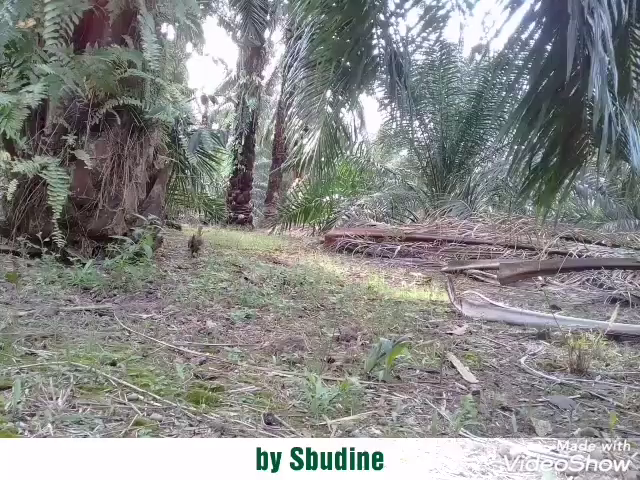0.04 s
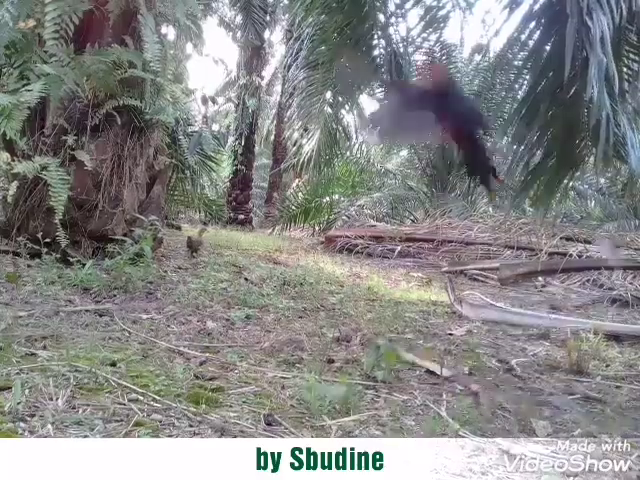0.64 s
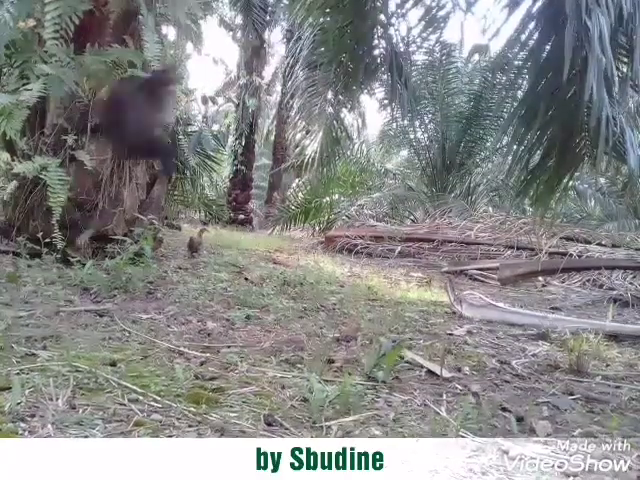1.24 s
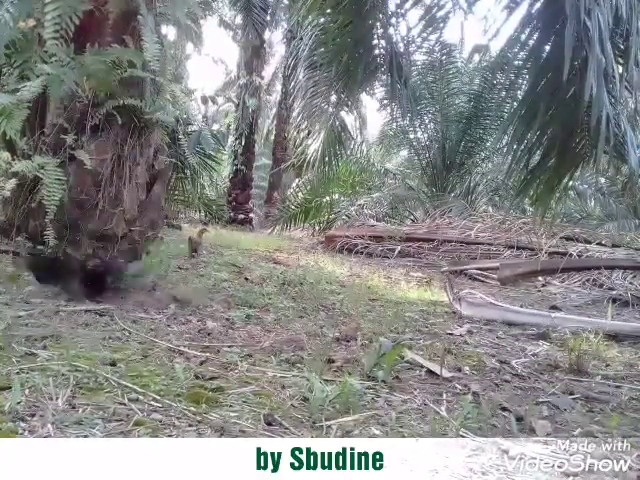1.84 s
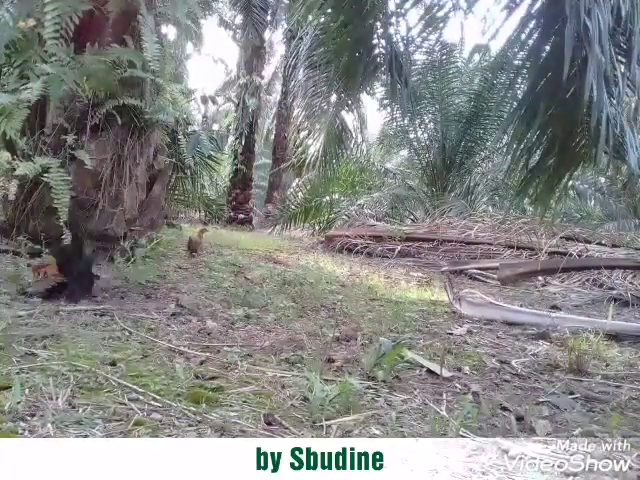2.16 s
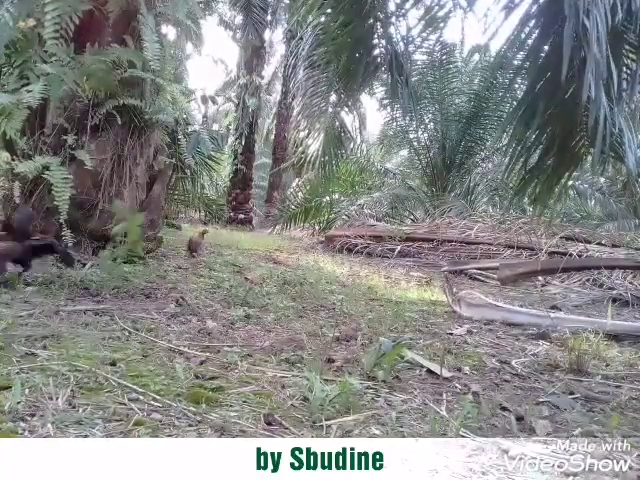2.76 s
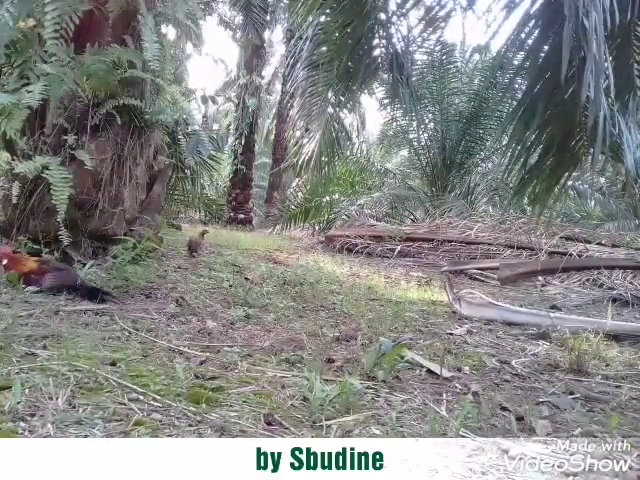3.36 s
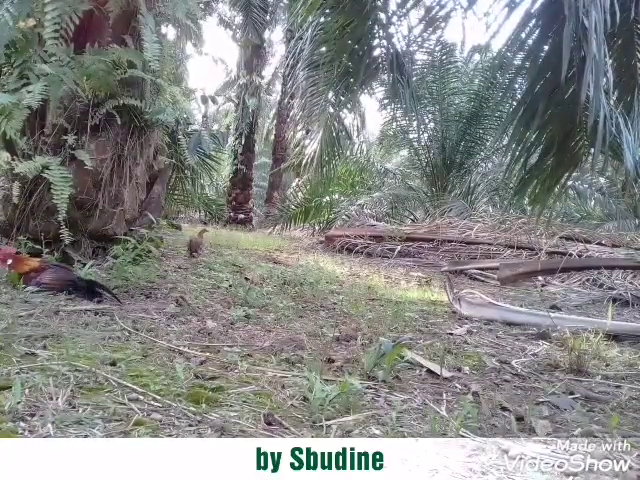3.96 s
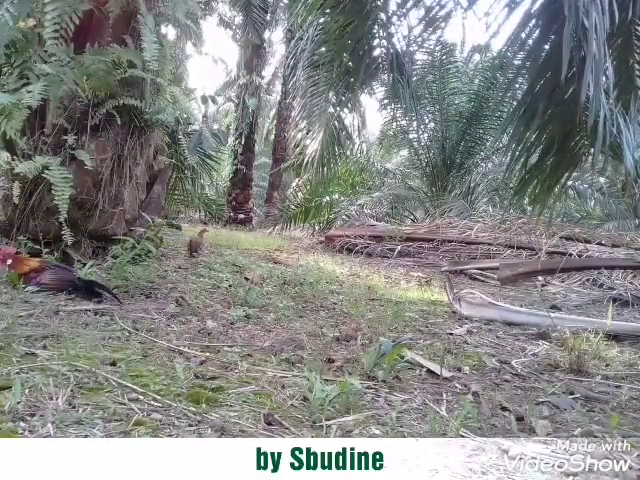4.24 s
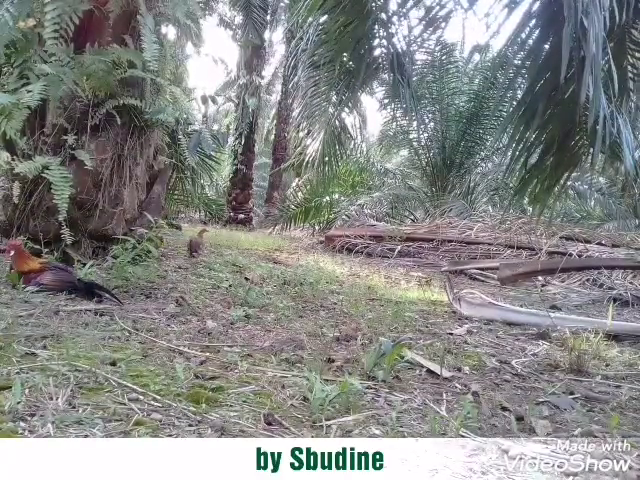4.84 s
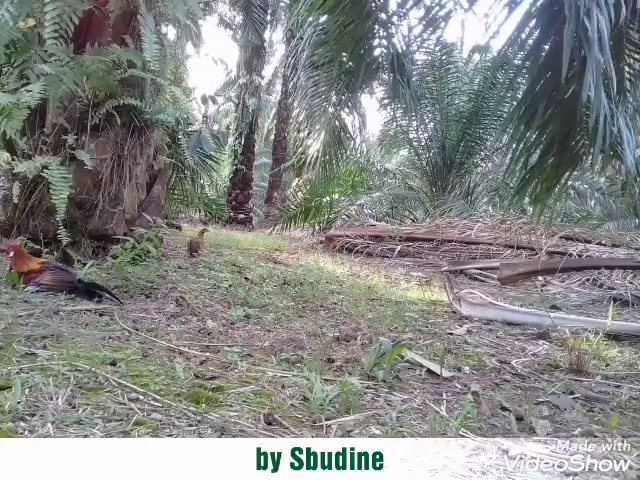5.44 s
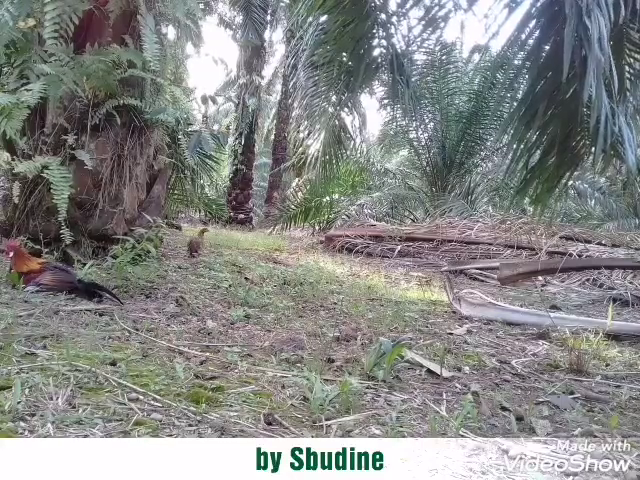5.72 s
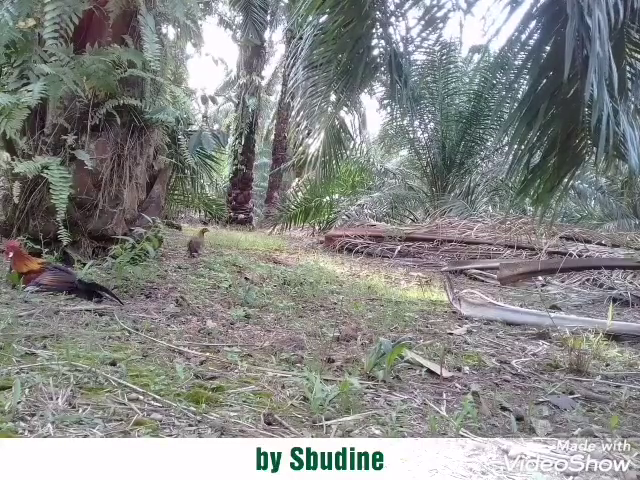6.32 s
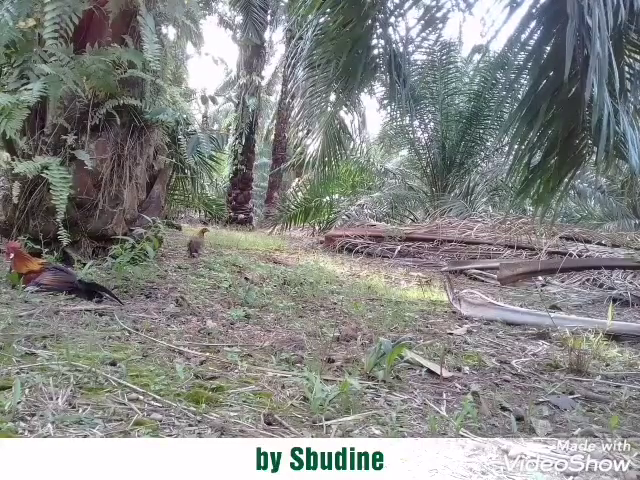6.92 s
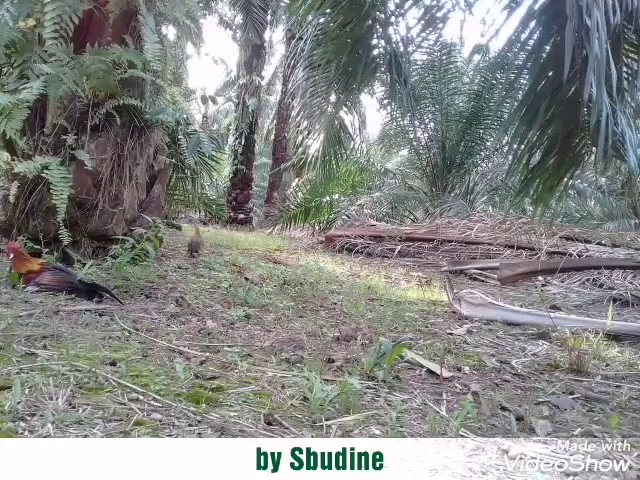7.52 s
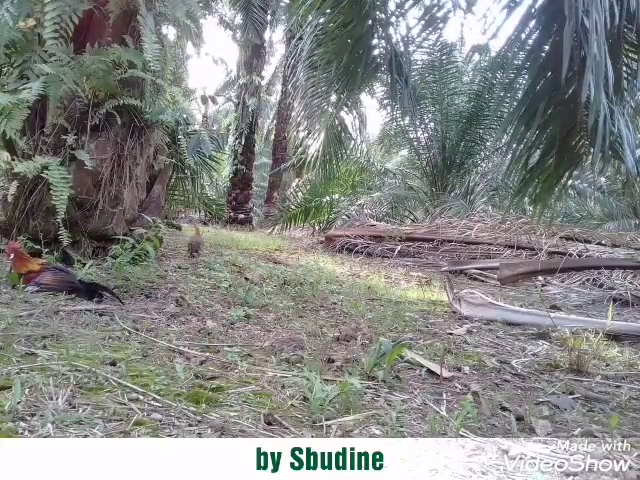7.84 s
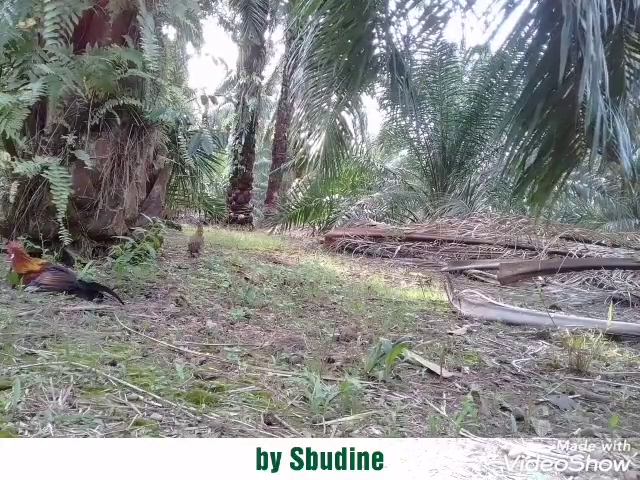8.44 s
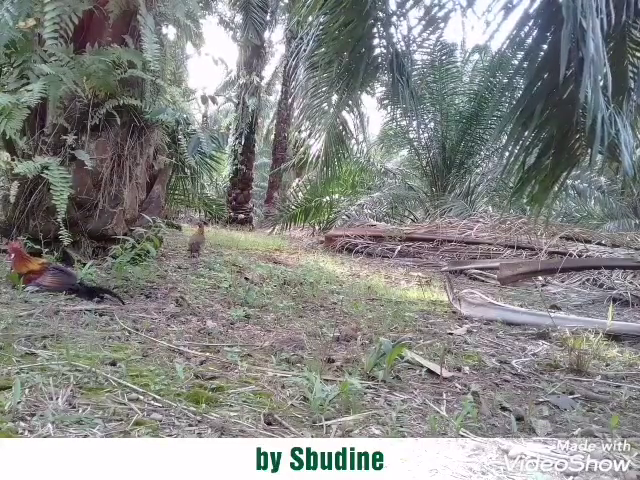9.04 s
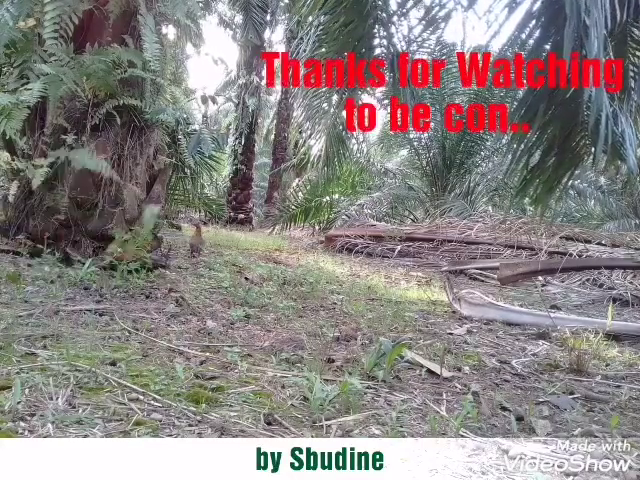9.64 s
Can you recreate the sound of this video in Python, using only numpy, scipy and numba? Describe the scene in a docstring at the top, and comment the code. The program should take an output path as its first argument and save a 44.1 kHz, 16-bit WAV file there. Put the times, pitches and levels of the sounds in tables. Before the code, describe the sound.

A wild rooster flutters close to the microphone in a quiet palm grove. Wingbeats start at once with three short clucks, and are loudest from about 0.5 to 1 second, with sharp quill snaps, hollow thuds and a low gust of air as he passes overhead. A few thin, very high squeaks follow. He flaps on until about 2 seconds, then scuffles in dry leaves. A quick run of short, raspy clucks lasts from about 1.9 to 3 seconds, with a few much fainter ones until 4.7. A distant bird pips softly near 3.3 and 5.2 seconds, and an insect gives faint trills around 4 to 5. From 4.8 seconds to the end, around 9.5, he shifts in the crackling leaves in short spells, fullest near 8, with small snaps and soft thumps. Underneath are a soft air hiss, a barely audible far rumble and faint high insects slowly fading.

```python
"""Insects sing in a palm grove as a wild rooster flutters up past a low microphone: quills snap, wings thud and
fan the air, and a small bird lets out thin squeaks. About two seconds in he lands, scuffles in dry, crackling
leaves and gives a run of short clucks, rough pulses that ring in his throat. As the clucks die away, a far bird
pips and an insect trills. Later he shifts about in the leaves, a soft rumble swells twice in the distance, and
the insects slowly ease off."""
import sys
import numpy as np
from scipy import signal
from scipy.fft import rfft, irfft
from scipy.io import wavfile
from scipy.ndimage import uniform_filter1d
from numba import njit

SR = 44100
rng = np.random.default_rng(int(sys.argv[2]) if len(sys.argv) > 2 else 0)


def dump(signal):
    """Clip the signal to [-1, 1] and save it as 16-bit WAV at the path in sys.argv[1]."""
    limited = np.clip(np.atleast_2d(signal).T, -1, 1)
    pcm = np.round(limited * 32767).astype(np.int16)
    wavfile.write(sys.argv[1], SR, pcm)


N = 426888
T = np.arange(N) / SR

# How strong each frequency is in the grove's air, dry leaves and feathers: frequency_hz, relative_db
AIR_TONE = [(20, -25), (45, -2), (85, -1), (190, 0), (400, -4), (700, -4), (1300, -7.5), (2500, -5.5),
            (4400, -10.5), (6300, -12.5), (8000, -6.5), (9500, -5.5), (11500, -12.5), (15500, -15.5)]
LEAF_TONE = [(200, -22.5), (1500, -30), (3000, -19), (5000, -12), (7000, -9), (8400, -4), (9500, 2),
             (10300, -2.5), (11300, -8.5), (13000, -13), (14600, -16.5), (15800, -42)]
FEATHER_TONE = [(40, -20.5), (90, -6), (190, -13), (350, -1.5), (750, -3.5), (1200, -7.5), (1900, -5.5),
                (2700, -6.5), (4500, -8), (8000, -23), (15000, -46)]
# Swells of a soft, far rumble: peak_s, level_db
FAR_RUMBLES = [(6.3, -74), (9.3, -72.5)]
# Insects that sing all the time: pitch_hz, width_hz, level_db (before the chorus boost and fade)
INSECT_BANDS = [(2470, 460, -86), (3320, 170, -77.5), (7240, 380, -71), (7540, 130, -69.5), (8230, 78, -79),
                (8600, 120, -78), (8700, 200, -75.5)]
# One insect's short trills: peak_s, level_db
INSECT_TRILLS = [(3.7, -72), (4.37, -66.5), (4.72, -78), (5.0, -66.5), (5.34, -78)]
# A far bird's notes: start_s, pitch_hz, level_db
BIRD_PIPS = [(3.212, 2380, -58.5), (3.321, 2430, -59.5), (5.217, 2613, -56)]
# Thin, high squeaks: start_s, fade_s, level_db
HIGH_SQUEAKS = [(1.126, 0.0087, -33), (1.19, 0.025, -43.5), (1.277, .008, -42), (2.802, .015, -49),
                (3.583, 0.009, -56)]
# Feet and body shuffling in dry leaves: start_s, attack_s, hold_s, leaf_db, feather_db
LEAF_SHUFFLES = [(2.07, 0.022, 0.075, -54.5, -57), (2.31, 0.021, 0.092, -54.5, -63),
                 (2.504, .016, .015, -41.5, -49), (2.535, 0.031, 0.021, -38.5, -49),
                 (2.805, 0.017, .015, -49.5, -52), (2.92, 0.042, 0.14, -53, -63.5),
                 (4.761, 0.0091, .01, -50.5, -51.5), (4.803, 0.014, .005, -45, -57.5),
                 (4.895, 0.037, 0.011, -52.5, -55), (5.37, 0.054, 0.023, -40, -59.5),
                 (5.47, 0.027, 0.034, -47, -63), (5.6, .1, 0.39, -58.5, -73), (5.92, 0.03, .01, -53.5, -71),
                 (6.428, 0.026, .008, -41.5, -62.5), (6.505, 0.022, 0.065, -44.5, -59),
                 (6.846, 0.0071, 0.037, -55, -72), (6.895, .028, 0.0036, -48.5, -65),
                 (7.08, 0.05, 0.14, -50.5, -62), (7.4, 0.036, 0.06, -53.5, -62.5),
                 (7.56, 0.036, .01, -58, -68), (7.75, 0.036, 0.3, -51, -61),
                 (7.955, 0.083, 0.053, -39, -55.5), (8.11, .06, 0.059, -43, -56.5),
                 (8.235, .012, 0.017, -38, -53.5), (8.33, 0.15, 0.036, -54.5, -62),
                 (8.878, 0.023, 0.017, -44, -52), (9.28, 0.045, 0.18, -58.5, -61),
                 (9.53, 0.094, 0.037, -54, -59.5)]
# Wings sweeping through air and leaves: start_s, hold_s, leaf_db, feather_db, air_db
WING_SWEEPS = [(0, 0.07, -42.5, -47, -54), (0.087, 0.039, -42, -47, -59), (0.155, 0.064, -43.5, -46.5, -53),
               (0.244, 0.084, -43.5, -50, -58.5), (.357, 0.006, -40, -41, -50),
               (0.412, 0.038, -40.5, -43.5, -46.5), (.485, 0.023, -31.5, -34.5, -49),
               (0.525, 0.0044, -21, -27, -44), (.595, 0.13, -54, -46.5, -55),
               (0.751, 0.0086, -34.5, -40.5, -51), (0.814, 0.11, -42, -46, -46),
               (0.959, 0.021, -33, -40.5, -42), (1.008, 0.022, -46, -48, -41),
               (1.068, 0.012, -37.5, -44.5, -57), (1.128, 0.028, -52, -47, -48),
               (1.198, 0.061, -55, -52.5, -58), (1.274, 0.07, -48, -51, -55),
               (1.43, 0.14, -50.5, -53.5, -59), (1.504, .025, -44, -51, -58),
               (1.543, 0.019, -39, -41.5, -50), (1.57, 0.045, -34.5, -41, -45),
               (1.652, 0.096, -43.5, -48, -55), (1.775, 0.062, -41.5, -45, -49),
               (1.861, 0.048, -43, -43.5, -49.5), (1.927, .055, -39.5, -44.5, -47),
               (2.017, 0.042, -42.5, -44, -48)]
# Wings and feet beating air and ground: peak_s, level_db, pitch_hz, length_s (roughly)
AIR_THUDS = [(0.08, -42, 420, 0.0094), (0.265, -34.5, 368, 0.0063), (0.42, -40, 467, 0.024),
             (0.478, -33, 506, 0.0067), (0.525, -29, 560, 0.015), (0.685, -37.5, 392, 0.0075),
             (0.819, -40, 755, 0.0055), (1.099, -37, 340, 0.0084), (1.314, -36, 1030, 0.006),
             (1.429, -37, 318, 0.016), (1.469, -31.5, 437, 0.01), (1.547, -38.5, 610, 0.017),
             (1.586, -26.5, 550, 0.015), (1.706, -38, 800, 0.011), (1.784, -31.5, 530, 0.025),
             (1.82, -37, 367, 0.017), (1.941, -28.5, 370, 0.0022), (1.97, -37.5, 630, 0.0074),
             (2.057, -40, 395, 0.02), (4.769, -44.5, 870, 0.0041), (4.813, -50, 715, 0.0088),
             (4.94, -48.5, 770, 0.011), (7.174, -54, 730, 0.007), (7.57, -67, 700, 0.007),
             (7.782, -57, 670, 0.021), (7.916, -56, 566, 0.0051), (8.168, -48.5, 480, 0.018),
             (8.414, -53.5, 770, 0.025), (8.481, -51, 560, 0.0049), (8.917, -46, 780, 0.0054),
             (8.984, -51.5, 700, 0.011), (9.041, -52.5, 502, 0.038), (9.102, -56, 513, 0.0048),
             (9.354, -50.5, 364, 0.0069), (9.488, -57.5, 665, 0.022)]
# Quills clacking and twigs snapping: start_s, knock_db, knock_hz, crack_db
SHAFT_SNAPS = [(0.041, -30, 3770, -23), (0.058, -31, 3960, -24), (0.2357, -28, 2750, -24.5),
               (0.3133, -25.5, 2200, -32), (0.478, -18.5, 3000, -15.5), (0.5263, -19.5, 3150, -15),
               (0.535, -20, 1980, -13), (0.5466, -23, 2830, -29), (0.7552, -41, 2630, -14),
               (0.758, -21, 1870, -22), (0.8688, -24.5, 2420, -15.5), (0.894, -29, 3730, -20.5),
               (0.9629, -13.5, 1200, -16.5), (1.0204, -38, 3000, -22), (1.164, -43, 3230, -24),
               (1.249, -35.5, 1530, -22), (1.29, -19.5, 1510, -27), (1.363, -50, 3000, -28.5),
               (1.4033, -22.5, 1790, -28), (1.575, -24, 1980, -27), (1.589, -19.5, 1670, -30),
               (1.8218, -25, 1730, -26), (1.94, -26.5, 1380, -26), (2.0405, -25.5, 3780, -50),
               (3.0861, -34, 1130, -50), (4.7699, -37, 1070, -36), (4.8179, -59, 1270, -28),
               (6.445, -75, 4430, -27), (6.5272, -34.5, 4870, -38), (6.852, -66, 4210, -34),
               (7.526, -66, 3210, -31.5), (8.244, -52, 3300, -30), (8.892, -33, 5300, -35),
               (8.911, -33, 2000, -35)]
# Clucks: start_s, length_s, throat_hz (beak wide open), level_db (before the cluck's rise and fall),
# upper_db (the higher ring compared with the lower one)
ROOSTER_CLUCKS = [(0.066, 0.037, 1370, -44, 4), (0.152, 0.034, 1530, -38, 6.5),
                  (0.266, 0.031, 1310, -38.5, 3), (1.875, 0.031, 2220, -41, -10),
                  (1.965, 0.026, 2100, -43, -3), (2.073, 0.045, 1160, -42.5, -9),
                  (2.174, 0.041, 2250, -39.5, -4), (2.286, 0.038, 1430, -39.5, 3),
                  (2.392, 0.034, 2080, -40, -3), (2.505, 0.036, 2000, -40.5, 2.5),
                  (2.614, 0.033, 1600, -42, 1), (2.715, 0.032, 1360, -41, -1.5),
                  (2.819, 0.027, 1180, -44, -22), (2.906, 0.028, 1180, -46.5, -4),
                  (3.044, 0.024, 1060, -48, -2), (3.42, .025, 1720, -64, -8),
                  (3.534, 0.032, 1770, -60, -15), (3.945, 0.033, 1700, -64.5, 5),
                  (4.663, 0.03, 1740, -64, -4)]


def undb(db):
    """Turn decibels into a number to multiply a sound by."""
    return 10 ** (np.asarray(db) / 20)


def unit(x):
    """Scale a signal so its average strength (rms) is 1."""
    return x / np.sqrt(np.mean(x ** 2))


def add(out, start_s, x):
    """Mix a short sound in at the given time."""
    i = max(int(start_s * SR), 0)
    out[i:i + len(x)] += x[:max(N - i, 0)]


def colour(x, tone, size=4096):
    """Filter a sound to follow a tone table, at strength 1."""
    hz, db = np.transpose(tone)
    bins_hz = np.fft.rfftfreq(size, 1 / SR)
    log_gain = np.log(undb(np.interp(np.log(bins_hz + 1), np.log(hz), db)))
    cepstrum = irfft(log_gain)[:size // 2]  # one half only, so nothing rings ahead of a click
    cepstrum[1:] *= 2
    response = irfft(np.exp(rfft(cepstrum, size)))
    return unit(signal.fftconvolve(x, response)[:len(x)])


@njit
def band_pass(x, hz, width_hz):
    """Let through one band of frequencies, whose centre may move."""
    y, band, low = np.empty(len(x)), 0., 0.
    for i in range(len(x)):
        step, damping = np.tan(np.pi * hz[i] / SR), width_hz / hz[i]
        now = (band + step * (x[i] - low)) / (1 + step * (step + damping))
        band, low, y[i] = 2 * now - band, low + 2 * step * now, damping * now
    return y


def ring(x, hz, width_hz):
    """Make a sound ring near one pitch by filtering it twice, each time width_hz wide."""
    centre = np.full(len(x), 1.) * hz
    return band_pass(band_pass(x, centre, float(width_hz)), centre, float(width_hz))


def noise_band(hz, width_hz):
    """Steady noise around one pitch, at strength 1."""
    return unit(ring(rng.standard_normal(N), hz, width_hz))


def wander(rate_hz):
    """A random curve of size about 1 that turns rate_hz times a second."""
    k = int(SR / rate_hz)
    steps = np.repeat(rng.standard_normal(N // k + 1), k)
    return unit(uniform_filter1d(steps, k)[:N])


def clicks(per_s, spread_db):
    """Tiny clicks at random times, a few larger than the rest."""
    size = undb(spread_db * np.minimum(rng.exponential(size=N), 5))
    return (rng.random(N) < per_s / SR) * size * rng.choice([-1, 1], N)


def envelope(start_s, attack_s, hold_s, release_s):
    """A loudness curve that rises smoothly, holds, then dies away."""
    t = T - start_s
    rise = np.sin(np.pi / 2 * np.clip(t / attack_s, 0, 1)) ** 2
    return rise * np.exp(-np.maximum(t - attack_s - hold_s, 0) / release_s)


def movements(rows, release_s):
    """One loudness curve for each dB column; movements that overlap add in power."""
    power = 0
    for start_s, attack_s, hold_s, *levels_db in rows:
        shape = envelope(start_s, attack_s, hold_s, release_s)
        power = power + np.outer(undb(levels_db) ** 2, shape ** 2)
    return np.sqrt(power)


def swells(rows, swell_s):
    """A loudness curve with a smooth hump at each listed time."""
    return sum(undb(db) * np.exp(-((T - peak_s) / swell_s) ** 2) for peak_s, db in rows)


def grove_air(level_db=-65.5):
    """Still air hisses softly under the palms while a far rumble comes and goes."""
    air = colour(rng.standard_normal(N), AIR_TONE) * undb(level_db + 0.53 * wander(3.2))
    rumble = noise_band(175, 320) * swells(FAR_RUMBLES, swell_s=1)
    return air + rumble


def insects(boost_db=3.5, fade_db_per_s=1.04):
    """A chorus sings in narrow bands and slowly fades; one insect adds short trills."""
    chorus = sum(noise_band(hz, width_hz) * undb(db + wander(6.4)) for hz, width_hz, db in INSECT_BANDS)
    trill = noise_band(3420 + 50 * wander(4.1), 600) * undb(2 * wander(45))
    return chorus * undb(boost_db - fade_db_per_s * T) + trill * swells(INSECT_TRILLS, swell_s=0.089)


def far_bird(attack_s=0.0011, fade_s=0.02, waver=0.012):
    """Thin, far notes start cleanly and fade among the trees."""
    out, t = np.zeros(N), T[:8192]
    shape = np.exp(-t / fade_s) * (1 - np.exp(-t / attack_s))
    for start_s, hz, db in BIRD_PIPS:
        pitch = hz * (1 + waver * wander(200)[:len(t)])
        note = unit(np.sin(2 * np.pi * np.cumsum(pitch) / SR))
        add(out, start_s, undb(db) * note * shape)
    return out


def tree_echoes(x, die_away_s=0.58):
    """Trunks and fronds scatter the sound back as many tiny echoes."""
    t = T[:SR // 2]
    shape = np.exp(-np.log(1000) * t / die_away_s) * (1 - np.exp(-t / 0.0017))
    echoes = ring(rng.standard_normal(len(t)) * shape, 2340, 7200)
    return signal.fftconvolve(x, echoes / np.linalg.norm(echoes))[:N]


def squeaks(low_hz=10400, high_hz=13200, width_hz=350, low_db=-1):
    """Two narrow, very high tones sound together for an instant."""
    out, t = np.zeros(N), T[:4096]
    for start_s, fade_s, db in HIGH_SQUEAKS:
        noise = rng.standard_normal(len(t))
        tones = unit(ring(noise, high_hz, width_hz)) + undb(low_db) * unit(ring(noise, low_hz, width_hz))
        add(out, start_s, undb(db) * unit(tones) * np.exp(-(t / fade_s) ** 2))
    return out


def settle(gain, tail_db=-12, fade_s=0.37):
    """Give a loudness curve a faint tail: disturbed leaves keep stirring for a while."""
    keep = np.exp(-2 / (fade_s * SR))
    tail_power = signal.lfilter([1 - keep], [1, -keep], gain ** 2)
    return np.sqrt(gain ** 2 + undb(tail_db) ** 2 * tail_power)


def rustle(leaf_gain, feather_gain):
    """Dry leaves crackle under the bird, now and then one ticks, and his feathers brush over them."""
    crackle = colour(clicks(per_s=7000, spread_db=2), LEAF_TONE) * undb(1.09 * wander(70))
    ticks = colour(clicks(per_s=45, spread_db=0.5), LEAF_TONE)
    swish = colour(clicks(per_s=2600, spread_db=2.5), FEATHER_TONE) * undb(1.44 * wander(60))
    return (crackle + undb(-19) * ticks) * leaf_gain * undb(.5) + swish * feather_gain * undb(-0.1)


def patter(gain, per_s, hz, width_hz, db):
    """Quills or feet make small random knocks, louder when the bird moves harder."""
    return unit(ring(clicks(per_s, spread_db=1.5), hz, width_hz)) * gain * undb(db)


def wing_wind(air_gain, swirl_hz=218, overhead_hz=120.6):
    """Swirls from the wings hit the microphone over a low push of air; louder and deeper overhead."""
    overhead = envelope(start_s=.8, attack_s=0.037, hold_s=0.13, release_s=.22)
    swirls = noise_band(swirl_hz + (overhead_hz - swirl_hz) * overhead, width_hz=220)
    push = noise_band(hz=85, width_hz=75)
    gust_gain = overhead * undb(-41 + 4.5 * wander(30.1))
    return unit(swirls + undb(-9) * push) * np.hypot(air_gain, gust_gain)


def thuds(width_share=0.64, brush_db=-12, rise_share=0.56, fall_share=0.69):
    """Each stroke pushes a short, hollow puff of air, with feathers brushing in it."""
    out, t = np.zeros(N), T[:4096] - T[2048]  # t is 0 at the peak
    for peak_s, db, hz, length_s in AIR_THUDS:
        swell = np.exp(-abs(t / length_s / np.where(t < 0, rise_share, fall_share)) ** 1.9)
        air, brush = rng.standard_normal((2, len(t)))
        hollow = unit(ring(air, hz, hz * width_share))
        puff = (hollow + undb(brush_db) * colour(brush, FEATHER_TONE)) * swell
        loudest = np.sqrt(uniform_filter1d(puff ** 2, size=260).max())
        add(out, peak_s + t[0], undb(db) * puff / loudest)
    return out


def snaps(knock_s=0.0017, crack_s=0.00093, width_share=0.8, splinters=0.54):
    """A stiff quill or twig is struck or breaks: a bright crack and a short, hollow knock."""
    out, t = np.zeros(N), T[:1024]
    for start_s, knock_db, hz, crack_db in SHAFT_SNAPS:
        crack = colour(rng.standard_normal(len(t)) * np.exp(-t / crack_s), LEAF_TONE)
        push = rng.standard_normal(len(t)) * np.exp(-t / knock_s) * splinters
        push[0] += 2  # the blow itself
        knock = ring(push, hz, hz * width_share)
        add(out, start_s, undb(knock_db) * knock / abs(knock).max())
        add(out, start_s, undb(crack_db) * crack / abs(crack).max())
    return out


def clucks(pitch_hz=420, rasp=1.5, shut_hz=450, husk_db=-6):
    """Rough pulses ring the throat at two pitches, which rise as the beak opens and drop as it shuts."""
    out, t = np.zeros(N), T[:3072]
    for start_s, length_s, throat_hz, db, upper_db in ROOSTER_CLUCKS:
        progress = t / length_s
        jitter, quiver = (unit(uniform_filter1d(row, 120)) for row in rng.standard_normal((2, len(t))))
        beak = np.interp(progress, [0, .2, .42, .62, 1], [.62, .88, 1, .86, 0.2])  # 1 is wide open
        beak += .04 * quiver
        cycles = np.cumsum(pitch_hz * (.6 + .4 * beak) * (1 + 0.3 * jitter)) / SR
        pulses = unit(np.diff(np.floor(cycles), prepend=0))  # one click per cycle
        noise_bursts = unit(rng.standard_normal(len(t)) * np.exp(-2 * (cycles % 1)))
        buzz = pulses + rasp * noise_bursts
        throat = unit(ring(buzz, shut_hz + (throat_hz - shut_hz) * beak, width_hz=400))
        upper = unit(ring(buzz, 2920 * (0.711 + 0.28 * beak), width_hz=430))
        husk = unit(ring(buzz, 1780, width_hz=2300))
        voice = unit(throat + undb(upper_db) * upper + undb(husk_db) * husk)
        effort = np.interp(progress, [0, .12, .55, .85, 1.1], [0.48, 0.76, 0.73, 0.49, 0.047])
        add(out, start_s, undb(db) * effort * voice)
    return out


def scene():
    """Mix the grove, the rooster and his echoes into one channel."""
    wing_attack_s = 0.0071
    wingbeats = [(start_s, wing_attack_s, *rest) for start_s, *rest in WING_SWEEPS]
    wing_leaves, wing_feathers, air_gain = movements(wingbeats, release_s=0.029)
    foot_leaves, foot_feathers = movements(LEAF_SHUFFLES, release_s=0.063)
    leaf_gain = settle(np.hypot(wing_leaves, foot_leaves))
    feather_gain = settle(np.hypot(wing_feathers, foot_feathers))
    leaves = rustle(leaf_gain, feather_gain)
    quills = patter(wing_feathers, per_s=21, hz=2980, width_hz=1600, db=-15)
    footfalls = patter(foot_feathers, per_s=14, hz=720, width_hz=530, db=-8.5)
    voice = clucks()
    blows = snaps() + thuds() + quills + footfalls
    echo = tree_echoes(undb(-13.5) * voice + undb(-14.5) * blows)
    foreground = voice + blows + echo + leaves + wing_wind(air_gain) + squeaks()
    background = far_bird() + grove_air() + insects()
    return (background + foreground)[None]


def record(dry):
    """Cut away the very highest treble, above 15700 Hz."""
    return signal.sosfilt(signal.ellip(8, .2, 70, 15700, fs=SR, output="sos"), dry)


dry = scene()
out = record(dry)
dump(out)
```